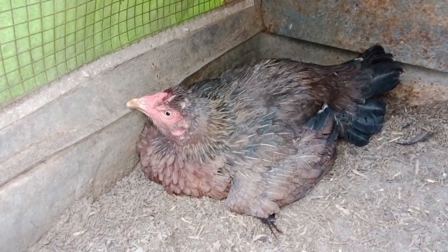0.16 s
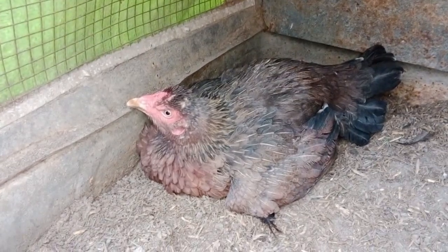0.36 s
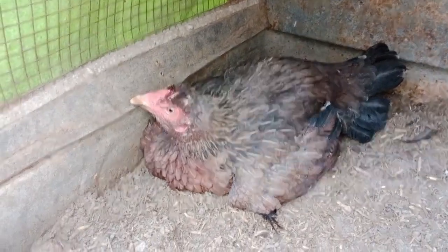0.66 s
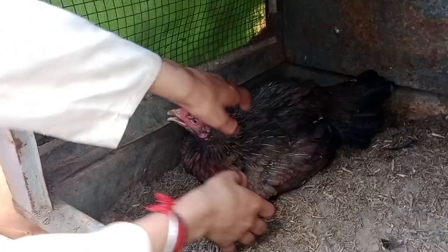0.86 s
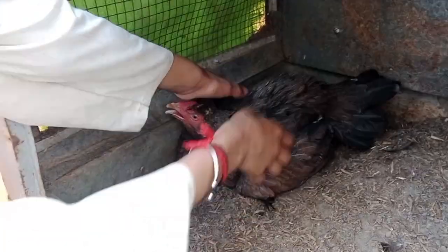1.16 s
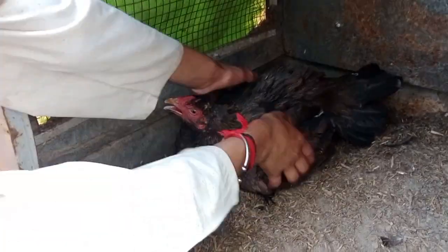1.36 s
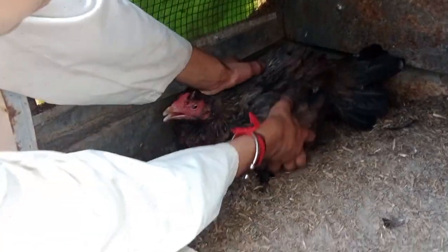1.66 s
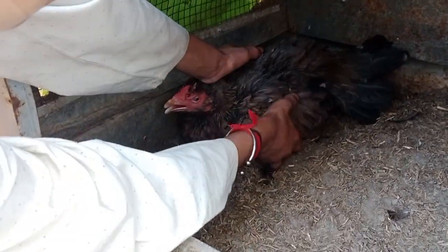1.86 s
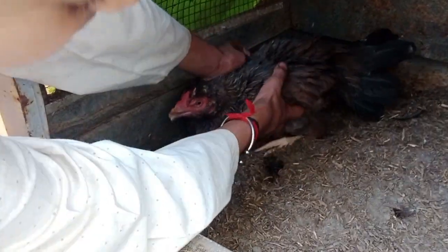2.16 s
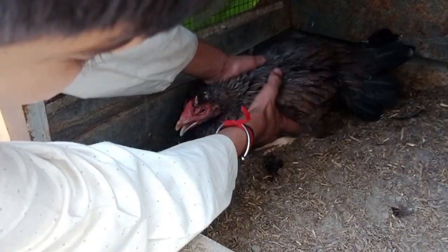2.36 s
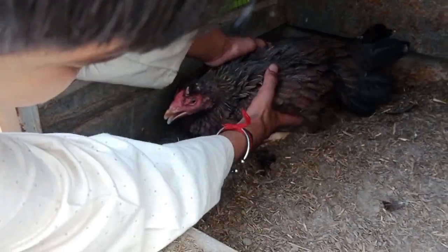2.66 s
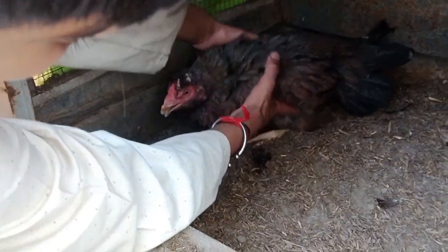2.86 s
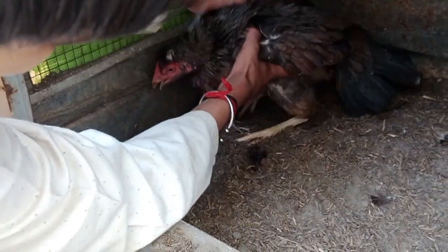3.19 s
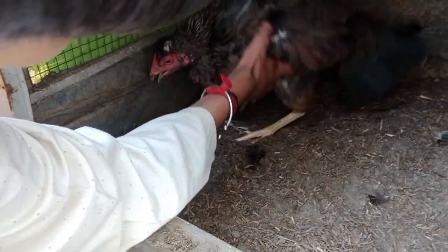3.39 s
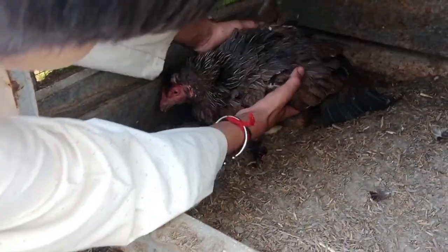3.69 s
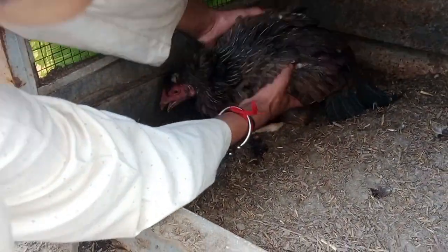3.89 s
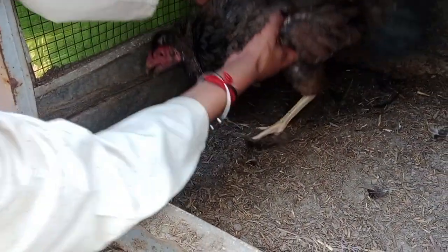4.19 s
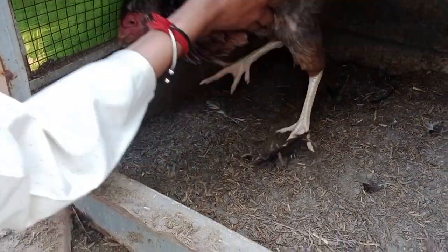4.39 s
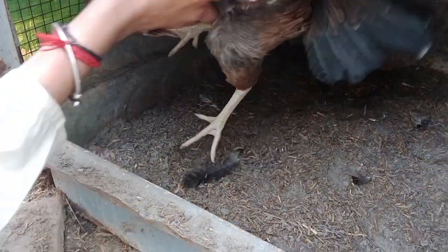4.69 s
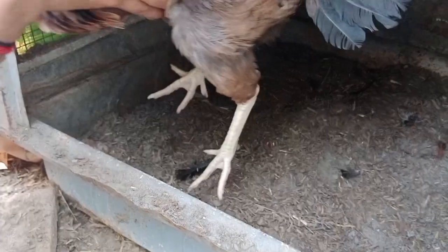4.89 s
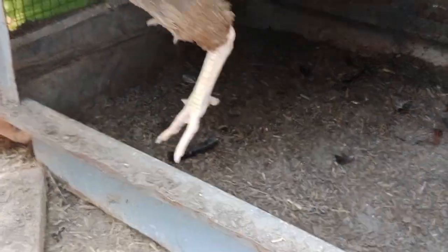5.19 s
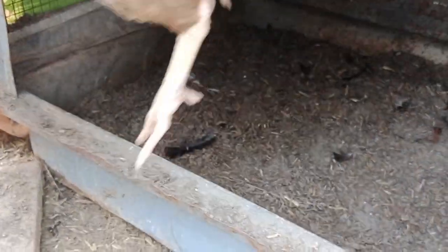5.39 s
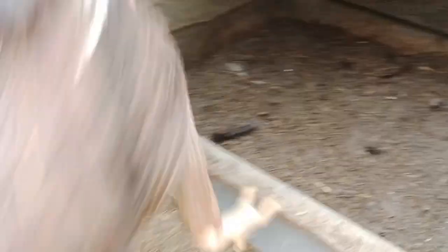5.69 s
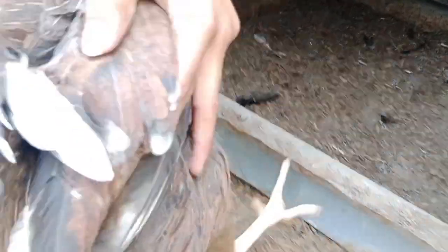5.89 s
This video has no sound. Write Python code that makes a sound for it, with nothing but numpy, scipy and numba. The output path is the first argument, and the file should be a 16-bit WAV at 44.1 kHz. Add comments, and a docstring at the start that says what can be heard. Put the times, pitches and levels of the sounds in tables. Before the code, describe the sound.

A hen squawks close to the microphone in a small outdoor coop, with quick reflections from near walls and very quiet air behind. The first cry is already sounding at 0 s and lasts to about 1.1 s, long, raspy and nasal, tightening to a clear note; feathers and litter rustle and soft board thumps come in the first 0.4 s. A thin wheeze and two faint chick peeps follow around 1.2-1.4 s. Shorter squawks swell and cut off at 1.4-1.9, 2.2-2.7 and 3.0-3.6 s, with small whistling wheezes in some gaps. Low bumps cluster near 3.7 s. Squawks at 3.8-4.2, 4.5-5.0 and 5.1-5.5 s are rougher, less clear, the middle one sagging at its end. A faint low moan and a wheeze come around 5.4-5.8 s, then dull knocks from 5.9 s and a weaker, hoarse squawk cut off at 6.1 s.

```python
"""A hen squawks eight times as she is gripped and lifted out of a small coop, close by.
Squawk: scattered syrinx pulses and puffs ring throat resonances; most rasps tighten to a clearer note.
Thin whistling wheezes fall in between, and she moans once. A chick peeps faintly in gliding tones.
Shaped noise and ticks make the feathers and litter; decaying low notes make the bumps on the coop.
Close walls answer voices and rustle; soft noise is the outdoor air."""
import sys
import numpy as np
from scipy import signal
from scipy.fft import rfft, irfft, next_fast_len
from scipy.io import wavfile
from scipy.ndimage import uniform_filter1d
from numba import njit

SR = 44100
rng = np.random.default_rng(int(sys.argv[2]) if len(sys.argv) > 2 else 0)


def transcribe(signal):
    """Save signal, clipped to [-1, 1], as a 16-bit WAV file at the path in sys.argv[1]."""
    frames = np.atleast_2d(signal).T
    limited = np.clip(frames, -1, 1)
    pcm = np.round(limited * 32767).astype(np.int16)
    wavfile.write(sys.argv[1], SR, pcm)


N = 266805
T = np.arange(N) / SR

# squawks: start/s, end/s, attack/s, swell/s, closing part/s, level/dB, swell/dB, closing level change/dB,
#   note clarity/0-1, rasp f/Hz, closing f/Hz, droop/0-1, gape f/Hz, gape share/0-1,
#   hardest blow t/s, blow sizzle/dB, judder/dB
SQUAWKS = [ (-0.1, 1.132, .03, .46, .095, -16.1, 5.5, 2.4, 1, 555.5, 566, .02, 3500, 0.05, .45, 1.5, 1.3),
           (1.386, 1.921, 0.039, 0.28, 0.1246, -15.6, 19.5, 3.4, .85, 558, 580, .02, 3621, 0.09, 1.65, 4, 1.2),
           (2.19, 2.679, 0.0712, 0.322, 0.069, -16.5, 16.5, 5.4, 0.87, 560, 572, .05, 3830, 0.54, 2.63, 6, 1.1),
           (2.957, 3.563, .065, .39, 0.1364, -15.6, 13.5, -1.04, 0.92, 561.7, 538, 0, 3710, .28, 3.41, 8, 1.2),
           (3.802, 4.234, 0.0845, .31, 0.053, -20.4, 14, -4, .3, 529.8, 554.6, 0, 3487, 0.26, 4.19, 4, 1.3),
           (4.524, 4.953, .022, .31, .088, -14.7, 19, 3.2, .35, 504.8, 518, .14, 3712, .95, 4.82, 4, 1.83),
           (5.135, 5.461, .04, .19, 0.0824, -17.2, 9.5, .3, 0.47, 518.5, 510, .07, 3599, 0.52, 5.31, 6, 1.92),
           (5.84, 6.1, .04, 0.1984, .03, -25, 10.5, -1, 0, 539.5, 539.9, 0, 3694, 0.05, 6.03, 1, 1.71)]
# stages as the beak opens and narrows: pinched start, top of swell, end of rasp,
#   clear note (approached as far as the clarity allows)
#   fundamental/dB, throat/dB, mouth/dB, beak/dB, upper resonances/dB, sizzle/dB,
#   then ratios to the squawk's own: pitch, gape f, gape share
STAGES = [(-10.5, 0.5, -6.5, -9.5, -12.5, -30, .95, 0.895, .35),
          (-13, -6.5, -4.5, -6.5, -13.5, -22.5, .99, .98, .5),
          (-10, -6.5, -3.5, -8, -13.5, -22.5, 1.005, 1.0088, 0.88),
          (-6, -22.5, -1.5, -15, -21, -32, 1.003, .95, 0.95)]
# resonances of throat and coop corner for each way she is held: f/Hz, width/Hz before tract() adjusts it, level/dB
SITTING = [(486, 150, -28), (793.8, 57, -8), (1094, 81, -9), (1405.2, 43.9, 0.5), (1720.6, 85, -7),
           (2648.6, 59, -6.5), (3018, 28, -17.5), (3349, 160, -15.5), (4180, 17, -35.5), (4320, 31, -26)]
CROUCHED = [(527.2, 57, 9), (844.7, 65, 3), (1237.8, 42, 3), (1380, 18, 0), (1685.8, 62, 3),
            (2226.6, 37, -26.5), (2209.5, 59, -12.5), (2686, 120, -15), (2957, 56, -14), (3410, 69, -12),
            (3575, 27, -15.5), (4000, 28, -16), (4253, 41, -15)]
GRIPPED = [(536.8, 58.1, 5.5), (848, 55.8, 1.5), (1170, 93, -4), (1496.6, 88, -6), (1677.6, 32, -4.5),
           (1963, 24, -25.5), (2188, 31, -19), (2729, 95, -13), (3376, 88, -18), (3382, 15, -24),
           (3950, 79, -24.5), (4600, 36, -19.5)]
PRESSED = [(533.7, 98.5, 3), (761.8, 27, 10), (1234, 194, -1.5), (1566.4, 50, -2.5), (1716, 43, -6),
           (2108, 15, -21.5), (2583, 65, -16.5), (3113, 23, -18.5), (3156, 29, -28), (3446, 36, -14.5),
           (4000, 34, -31.5), (4320, 51, -39.5)]
RAISED = [(560, 21.2, -14), (734, 25.8, -2), (1229, 188.6, 1.5), (1428.6, 146, 0.5), (1722.8, 48.8, 5),
          (2275.5, 22.4, -5.5), (2608, 61, -42), (3050, 191, -12.5), (3510, 66, -25), (3878, 37.5, -17.5),
          (4355, 39, -18)]
TWISTING = [(458.8, 20.2, -5), (577, 51, -10.5), (825, 66.2, -1.5), (1252, 50.7, -8), (1560, 95.6, -1.5),
            (1926, 79, 2.5), (2310, 125, -6.5), (2603, 53, -10), (2857, 85, -9.5), (3129, 31, -23),
            (3138.6, 51, -9), (3500, 23, -26.5)]
LIFTED = [(560, 52, -12.5), (771, 47, -10.5), (1026.8, 80, -10), (1453.6, 86, -11), (1997, 87, -29.5),
          (2660, 67, -13), (3378, 88, -26.5)]
DANGLING = [(525, 25, -32), (850, 30, -35), (1030, 293, -2), (1334.8, 16.4, -0.5), (1514.5, 24, -0.5),
            (1931, 54, -26.5), (2437, 245, -6.5), (2700, 32, -19), (3240, 30, -9), (3560, 28, -25.5),
            (3684, 18, -12.5), (4010, 58, -26.5)]
CARRIED = [(651.4, 26.4, 1.5), (855, 166, -4.5), (1138, 76, 1.5), (1379.2, 49, -0.5), (1701.6, 16.6, -19),
           (2000, 34, -34.5), (2250, 23.5, -24), (2467, 74, -13), (3310, 88, -26.5), (3713, 96, -19.5)]
# postures: from t/s, resonances, fundamental/dB, throat/dB, mouth/dB, beak/dB, upper resonances/dB, sizzle/dB
POSTURES = [(0, SITTING, -3.5, 1.2, .8, 0, 1.3, 1.5), (.72, CROUCHED, -.5, 1.5, -3, .8, 2.7, -1),
            (1.3, GRIPPED, 1.3, 1, -.5, -.5, 1, -.5), (2.1, PRESSED, -.5, 1, .3, 0, -1.5, -3),
            (2.85, RAISED, 1, 1, -1.5, 1.8, 1.2, 1.5), (3.3, RAISED, 2, -5, 1.3, 0, -1.5, 2.5),
            (3.7, TWISTING, -1.5, -.5, -1.5, 2.5, 2.3, 1), (4.4, LIFTED, -1.5, -2, 0, .5, -1.5, -2.5),
            (4.77, LIFTED, -7, -2.5, 2.6, 1.2, -3.2, -4.5), (5.06, DANGLING, -9.5, .7, .7, -1.7, -.3, -5.2),
            (5.7, CARRIED, -1, 1.5, 1, -3.5, -6, -11)]
# highest ring of the windpipe: f/Hz, level per Hz/dB
SIZZLE = [(2760, -46.5), (4700, -27.5), (4940, -33.5), (5250, -11.5), (5850, -15), (6440, -3), (7290, 2),
          (8690, -6.5), (9360, -19.5), (9990, -14.5), (10800, -22), (12300, -20), (14000, -27.5),
          (15500, -15)]
# wheezes: start/s, end/s, attack/s, whistle f/Hz, glide/(Hz/s), waver/0-1, whistle/dB, rasp/dB, fade/(dB/s)
WHEEZES = [(1.22, 1.40, .08, 1165, -250, .008, -42, -53, 75),
           (2.72, 2.92, 0.048, 1030, 400, .02, -51, -68, 105),
           (3.6, 3.8, .06, 1099, -100, .045, -50, -78, 15),
           (4.25, 4.48, 0.0575, 1250, -620, .05, -44, -51, 30),
           (4.98, 5.14, .02, 1040, -100, .04, -63, -65, 10),
           (5.46, 5.84, 0.0305, 1019, -110, .03, -46, -63, 46)]
# low moan: start/s, end/s, attack/s, f/Hz, level/dB
MOAN = (5.35, 5.53, .15, 300, -45)
# hand moves through feathers and litter: peak t/s, level/dB, rise by 20 dB/s, fall by 20 dB/s
RUSTLE = [(.1, -31, 3.4, .76), (1.75, -41, .38, .15), (2.6, -54, .33, .18), (3.32, -43, .25, .33),
          (3.74, -54, 0.02, .4), (4.3, -50.5, 0.82, 1), (5.05, -50, .5, .35), (5.5, -50.5, .4, .13),
          (5.645, -45, 0.07, .1), (6.04, -45.5, .14, 1.25)]
# spectrum of feathers and litter: f/Hz, level per Hz/dB
FEATHERS = [(150, -29), (300, -12.5), (500, 4), (900, -1), (1400, 6), (2200, 1.5), (3800, -20.5),
            (4800, -32), (5800, -17), (7200, -5.5), (8500, -13.5), (9800, -40), (15500, -41)]
# bumps on the coop: t/s, peak/dB, f/Hz, t60/s
BUMPS = [(0.089, -29.5, 286.3, 0.187), (0.164, -24.5, 211.4, 0.128), (0.208, -42.5, 250, 0.134),
         (0.38, -40.5, 112.5, 0.25), (1.439, -47, 111, 0.25), (1.62, -40.5, 324.4, 0.1777),
         (3.644, -36, 141.3, 0.226), (3.693, -32, 210.2, 0.155), (3.739, -38.5, 144.1, 0.25),
         (3.829, -45.5, 148.4, 0.436), (4.95, -34.5, 281, 0.1867), (5.024, -40.5, 112.2, 0.31),
         (5.068, -44, 113, 0.1534), (5.861, -30, 106.2, 0.18), (5.95, -23, 213.6, 0.0748),
         (5.999, -30.5, 89, 0.13)]
# chick peeps: start/s, end/s, first f/Hz, last f/Hz, level/dB
PEEPS = [(1.17, 1.26, 2310, 2240, -57.5), (1.32, 1.44, 2256, 2241, -52), (2.015, 2.055, 2320, 2307, -69.5),
         (2.11, 2.15, 2333, 2289, -76)]
# spectrum of outdoor air: f/Hz, level per Hz/dB
AIR = [(20, -34), (45, -9), (110, 3.5), (190, 4.5), (330, -19.5), (700, -6), (1100, -1), (1800, -26),
       (3000, -23.5), (7200, -28.5), (15000, -43.5)]

# roughness at the start, lost per stage, lost in a fully clear note
RASP_ROUGH, RASP_EASING, NOTE_SMOOTHING = 1.02, .08, .62
RELEASE_DB_PER_S, WHEEZE_RELEASE_DB_PER_S = 800, 330
HALF_PITCH_DB = -21  # subharmonic, relative to the stage's fundamental
DROOP_S = .025  # where there is droop, the pitch sags as the pressure fails
DROOP_THROAT_DB = 75  # per unit of droop: the second partial slides into the throat resonance
BLOW_S = .05  # half-length of the hardest blow
TREBLE_LAG_S, TREBLE_LAG_DB, TREBLE_END_DB = .035, -12, -6  # treble joins late, leaves first
SLEEVES_DB = -17.5  # relative to the rubbing
PEEP_FADE_S = .015
AIR_DB = -66.5
TOP_HZ = 15500


def squawks():
    """Each swells as a rasp and holds; most tighten into a clearer note, some push or droop, then stop quickly."""
    (start, end, attack, swell, closing_s, level_db, swell_db, closing_db, clarity,
     rasp_hz, closing_hz, droop, gape_hz, gape, blow_at, blow_db, judder_db) = current(SQUAWKS)
    opening = ramp(start, swell)
    holding = ramp(start + swell, end - closing_s - start - swell)
    closing = ramp(end - closing_s, closing_s)
    clear = np.clip(clarity, 0, 1) * np.sin(np.pi / 2 * closing)
    sag = droop * ramp(end - DROOP_S / 2, DROOP_S)

    stage = opening + holding + clear
    root, throat, mouth, beak, upper, sizzle, pitch_ratio, gape_ratio, gape_share = (
        np.interp(stage, np.arange(len(STAGES)), column) for column in np.transpose(STAGES))
    pitch_hz = pitch_ratio * (rasp_hz + (closing_hz - rasp_hz) * closing) * (1 - sag)
    rough = RASP_ROUGH - RASP_EASING * (opening + holding) - NOTE_SMOOTHING * np.sqrt(clear)
    rough = np.clip(rough, 0, 2)

    blow = 1 / (1 + ((T - blow_at) / BLOW_S) ** 2)
    dull_db = TREBLE_LAG_DB * (1 - ramp(start, TREBLE_LAG_S)) + TREBLE_END_DB * ramp(end, TREBLE_LAG_S)
    weights_db = np.array([root, throat + DROOP_THROAT_DB * sag, mouth,
                           beak + dull_db, upper + dull_db, sizzle + blow_db * blow])
    gape_now = np.clip(gape * gape_share, 0, 1)
    sound = voice(pitch_hz, rough, weights_db, gape_hz * gape_ratio, gape_now, root + HALF_PITCH_DB)

    effort_db = level_db - swell_db * np.cos(np.pi / 2 * opening) ** 2 + closing_db * closing
    gain = undb(effort_db + judder_db * walk(75))
    return envelope(start, attack, end, RELEASE_DB_PER_S) * gain * sound


def voice(pitch_hz, rough, weights_db, gape_hz, gape, half_pitch_db,
          trade_db=1.5, upper_shudder_db=1.0, sizzle_shudder_db=1.7, gape_width_hz=220):
    """The syrinx rings the tract; the weights share the sound out among its resonances."""
    shares = posture_shares()
    posture_db = np.transpose([row[2:] for row in POSTURES]) @ shares
    root_db, throat_db, mouth_db, beak_db, upper_db, sizzle_db = weights_db + posture_db
    source = syrinx(pitch_hz, rough, air=.3)
    rung = tract(source, shares)

    parts = [(root_db, 390, 630), (throat_db, 670, 950), (mouth_db, 980, 1490), (beak_db, 1520, 2250)]
    # in the rasp the resonances keep trading strength
    body = sum(undb(db + trade_db * rough * walk(45)) * steady(band(rung, low, high))
               for db, low, high in parts)
    # even air pressure holds the loudness while single cycles scatter
    body = steady(body, seconds=.009) * np.sqrt(sum(undb(db) ** 2 for db, _, _ in parts))
    half_pitch = undb(half_pitch_db) * steady(band(source, 302.65, 411.8, order=3))

    fixed_upper = steady(band(rung, 2300, 4228.5, order=8))
    gape_ring = steady(sliding(source, gape_hz, gape_width_hz))
    upper = np.sqrt(1 - gape) * fixed_upper + np.sqrt(gape) * gape_ring
    # the top of the voice is mostly rushing air, puffed out once a cycle
    rush = syrinx(pitch_hz, rough, air=1.3)
    sizzle = steady(steady(colour(rush, SIZZLE)) + 0.38 * steady(sliding(rush, 2 * gape_hz, 290)))

    shudder = rough * walk(70)  # the treble comes in irregular bursts
    treble = undb(upper_db + upper_shudder_db * shudder) * upper
    treble += undb(sizzle_db + sizzle_shudder_db * shudder) * sizzle
    return body + half_pitch + treble


def syrinx(pitch_hz, rough, air, jitter=0.19, scatter_db=4.5, limp_db=3.0, puff_s=0.0023):
    """Uneven closures, limping strong-weak when rough; a puff of turbulent air follows each."""
    chance = np.clip(rng.standard_normal((N // 20, 2)), -2, 2)
    limp = limp_db * (-1) ** np.arange(len(chance))
    size_db = limp + scatter_db * chance[:, 1]
    pulses = closures(pitch_hz, np.clip(rough, 0, 1), jitter * chance[:, 0], size_db)
    puff_flow = signal.lfilter([1], [1, -np.exp(-1 / (puff_s * SR))], pulses)
    puffs = puff_flow * rng.standard_normal(N)
    return steady(pulses) + air * np.sqrt(np.abs(rough)) * steady(puffs)


@njit
def closures(hz, rough, stretch, size_db):
    """A pulse at each closing of the membranes; roughness scatters the length and strength of each cycle."""
    pulses = np.zeros(len(hz) + 1)
    phase, cycle = 0., 0
    for i in range(len(hz)):
        step = hz[i] * np.exp(rough[i] * stretch[cycle]) / SR
        phase += step
        if phase >= 1:
            phase, cycle = phase - 1, cycle + 1
            size = 10 ** (rough[i] * size_db[cycle] / 20)
            # split over two samples to keep the exact time
            pulses[i] += size * phase / step
            pulses[i + 1] += size * (1 - phase / step)
    return pulses[:-1]


def tract(source, shares, narrowing=0.884, loss=0.0027, leak_db=-30):
    """Ring each posture's resonances, blending one into the next; the struggling head makes them waver."""
    out = undb(leak_db) * source
    for share, (_, modes, *_) in zip(shares, POSTURES):
        held = share > 1e-6
        ring = 0
        for i, (hz, width_hz, db) in enumerate(sorted(modes)):
            mode = resonance(source[held], hz, narrowing * width_hz + loss * hz)
            ring = ring + (-1) ** i * undb(db) * mode
        out[held] += share[held] * ring
    sway_s = .00018 * uniform_filter1d(walk(28), size=600)
    return np.interp(T + sway_s, T, out)


def posture_shares():
    """How far she is in each posture; one blends into the next."""
    posture = np.searchsorted([row[0] for row in POSTURES[1:]], T)
    return np.array([uniform_filter1d((posture == k) * 1., size=3000) for k in range(len(POSTURES))])


def wheezes(flutter_db=4.0):
    """Unsteady whistle, the second partial of a weak note, over a hoarse rasp; both fade as it glides."""
    start, end, attack, hz, glide, waver, whistle_db, rasp_db, fade = current(WHEEZES)
    age = np.clip(T - start, 0, end - start)
    # phase of the weak note, an octave below the whistle
    phase = np.pi * np.cumsum((hz + glide * age) * (1 + waver * walk(260))) / SR
    tone = undb(-19.0) * np.sin(phase) + np.sin(2 * phase)
    tone += undb(-19) * np.sin(3 * phase) + undb(-21) * np.sin(4 * phase)
    draught = rng.standard_normal(N)
    rasp = unit(band(draught, 2670, 3880)) + undb(-13) * unit(band(draught, 5930, 7900))
    flow = envelope(start, attack, end, WHEEZE_RELEASE_DB_PER_S) * undb(-fade * np.maximum(age - attack, 0))
    whistle = undb(whistle_db + flutter_db * walk(60)) * unit(tone)
    return flow * (whistle + undb(rasp_db + 2.17 * walk(80)) * rasp)


def moan(octave_db=-5, waver=.02, release_db_per_s=190):
    """A soft, low, wavering note and its octave."""
    start, end, attack, hz, db = MOAN
    phase = 2 * np.pi * np.cumsum(hz * (1 + waver * walk(120))) / SR
    tone = unit(np.sin(phase) + undb(octave_db) * np.sin(2 * phase))
    return envelope(start, attack, end, release_db_per_s) * undb(db) * tone


def handling():
    """Strength of the rubbing: each move of the hands builds up and dies away."""
    return np.sqrt(sum(undb(db - 20 * np.maximum((s - T) / rise, (T - s) / fall)) ** 2
                       for s, db, rise, fall in RUSTLE))


def rustle(grain_db=5, ticks_db=-6):
    """Feathers slide under the hands as fluctuating noise while bits of straw tick at random."""
    tick_gain = undb(grain_db * np.minimum(rng.exponential(size=N), 3))
    ticks = (rng.random(N) < 400 / SR) * rng.standard_normal(N) * tick_gain  # 400 per s on average
    slide = rng.standard_normal(N) * undb(2.3 * walk(49))
    return colour(slide + undb(ticks_db) * unit(ticks), FEATHERS)


def sleeves(rubbing):
    """Sleeves brush the coop as the hands move: uneven low noise."""
    brush = unit(band(rng.standard_normal(N), 98, 430, order=2))
    return rubbing * undb(SLEEVES_DB + 3.6 * walk(28)) * brush


def bumps(push_s=0.0052, scuff=0.577):
    """Soft blows: a low note of the boards and a dull scuff die away together."""
    out, t = np.zeros(N + SR), T[:SR // 2]
    for s, db, hz, t60 in BUMPS:
        noise = unit(band(rng.standard_normal(len(t)), 88, 380, order=2))
        ring = np.sin(2 * np.pi * hz * t) + scuff * noise
        blow = ring * (1 - np.exp(-t / push_s)) * np.exp(-np.log(1000) * t / max(t60, .02))
        start = max(int(s * SR), 0)
        out[start:start + len(t)] += undb(db) * blow / np.abs(blow).max()
    return out[:N]


def chick():
    """Faint pure peeps that sag in pitch."""
    start, end, first_hz, last_hz, db = current(PEEPS)
    hz = first_hz + (last_hz - first_hz) * ramp(start, end - start)
    gate = ramp(start, PEEP_FADE_S) * (1 - ramp(end, PEEP_FADE_S))
    return gate * undb(db) * unit(np.sin(2 * np.pi * np.cumsum(hz) / SR))


def coop(x, early_db=-12, early_t60=0.05, tail_db=-27, tail_t60=0.18):
    """Close walls answer at once; a faint, duller tail comes from the yard."""
    t = T[:SR // 2]
    early = rng.standard_normal(len(t)) * undb(-60 * t / early_t60) * (t > .002)
    tail = band(rng.standard_normal(len(t)), 150, 1600, order=1) * undb(-60 * t / tail_t60) * (t > .01)
    response = undb(early_db) * early / np.linalg.norm(early) + undb(tail_db) * tail / np.linalg.norm(tail)
    return x + signal.fftconvolve(x, response)[:N]


def outdoor_air():
    """Still outdoor air: coloured noise whose level drifts slowly."""
    return undb(AIR_DB + 1.4 * walk(1.3)) * colour(rng.standard_normal(N), AIR)


def undb(db):
    """Decibels to gain."""
    return 10 ** (np.asarray(db) / 20)


def unit(x):
    """Scale to rms 1."""
    return x / np.sqrt(np.mean(x ** 2))


def steady(x, seconds=0.0288):
    """Hold the short-term rms at 1, keeping the faster flutter."""
    size = max(int(seconds * SR), 64)
    power = uniform_filter1d(uniform_filter1d(x * x, size), size)
    return x / np.sqrt(power + 1e-18)


def walk(rate_hz):
    """Smooth random motion with rms 1."""
    size = int(SR / rate_hz)
    steps = np.repeat(rng.standard_normal(N // size + 1), size)
    return unit(uniform_filter1d(steps, size)[:N])


def colour(x, points):
    """Shape a sound by (Hz, dB) points, to rms 1."""
    hz, db = np.transpose(points)
    size = next_fast_len(N)
    bins_hz = np.maximum(np.fft.rfftfreq(size, 1 / SR), 1)
    gain = undb(np.interp(np.log(bins_hz), np.log(hz), db))
    return unit(irfft(rfft(x, size) * gain, size)[:N])


def band(x, low_hz, high_hz, order=4):
    """Flat band-pass."""
    sos = signal.butter(order, [low_hz, min(high_hz, SR * .45)], "band", fs=SR, output="sos")
    return signal.sosfilt(sos, x)


def resonance(x, hz, width_hz):
    """One two-pole resonance, gain 1 at its centre."""
    return signal.lfilter(*signal.iirpeak(hz, hz / max(width_hz, 15), fs=SR), x)


def sliding(x, hz, width_hz):
    """A resonance whose centre follows hz: a low-pass in a frame that turns with it."""
    turn = np.exp(2j * np.pi * np.cumsum(hz) / SR)
    lowpass = signal.butter(2, width_hz / 2, fs=SR, output="sos")
    return (turn * signal.sosfilt(lowpass, x / turn)).real


def current(events):
    """Each column of an event table, held until the next event starts."""
    table = np.array(events, float)
    return table.T[:, np.searchsorted(table[1:, 0], T)]


def ramp(start, seconds):
    """Rise from 0 to 1 in the given time."""
    return np.clip((T - start) / np.maximum(seconds, .001), 0, 1)


def envelope(start, attack, end, release_db_per_s):
    """Straight attack, hold, exponential release."""
    return ramp(start, attack) * undb(-release_db_per_s * np.clip(T - end, 0, 1))


def scene():
    """Hen, handling and chick in the coop, over still outdoor air."""
    rubbing = handling()
    enclosed = squawks() + wheezes() + moan() + rubbing * rustle() + chick()
    return (coop(enclosed) + sleeves(rubbing) + bumps() + outdoor_air())[None]


def record(dry):
    """Thin the deep bass below 38 Hz, fade out over the last 3 ms and cut steeply above TOP_HZ."""
    fade_out = np.minimum((T[-1] - T) / .003, 1)
    thinned = signal.sosfilt(signal.butter(2, 38, "high", fs=SR, output="sos"), dry)
    return signal.sosfilt(signal.ellip(10, .2, 80, TOP_HZ, fs=SR, output="sos"), thinned * fade_out)


dry = scene()
out = record(dry)
transcribe(out)
```